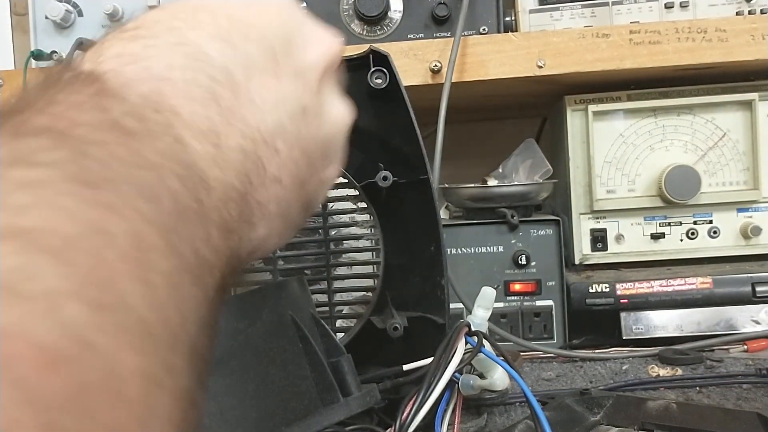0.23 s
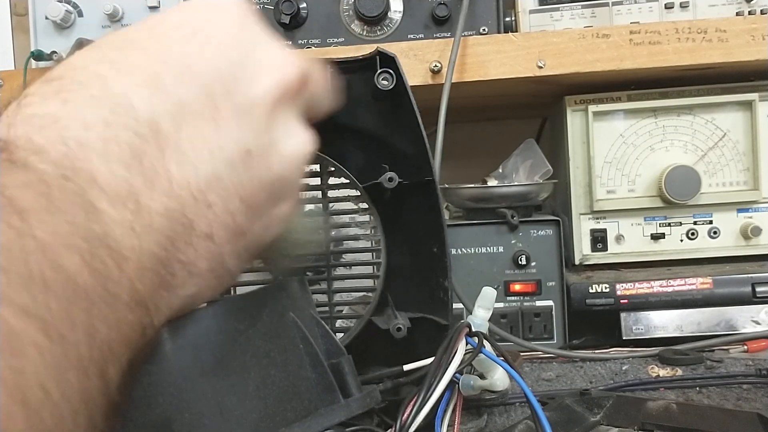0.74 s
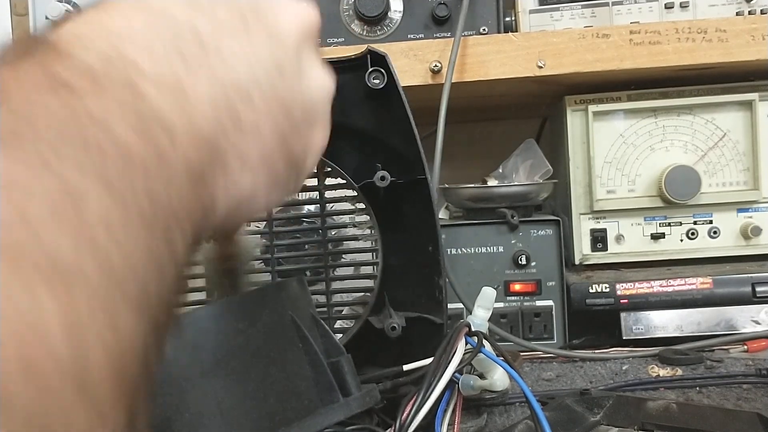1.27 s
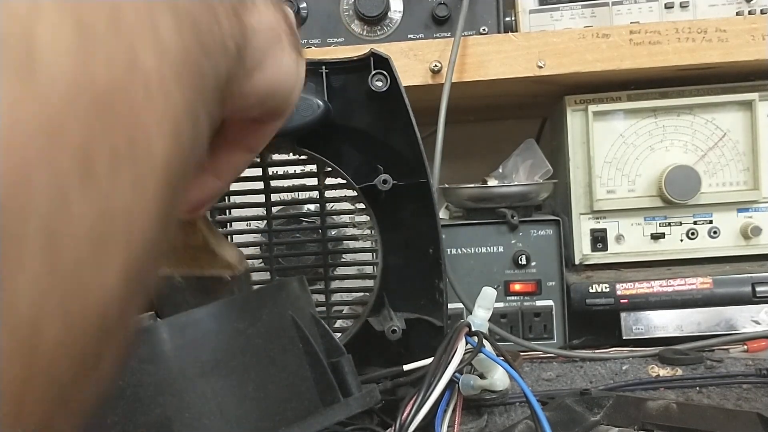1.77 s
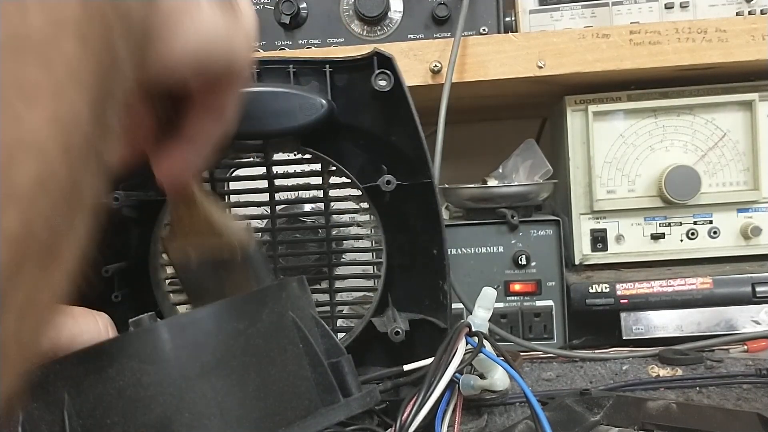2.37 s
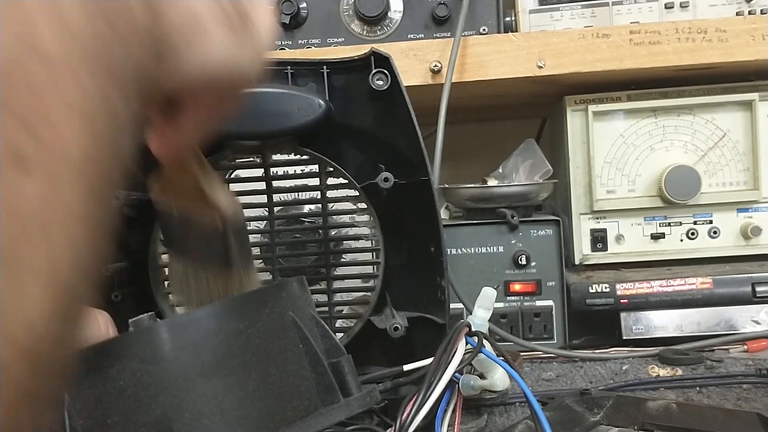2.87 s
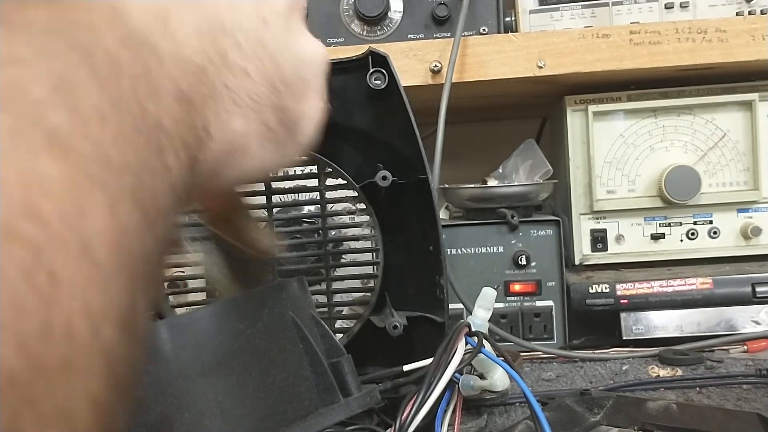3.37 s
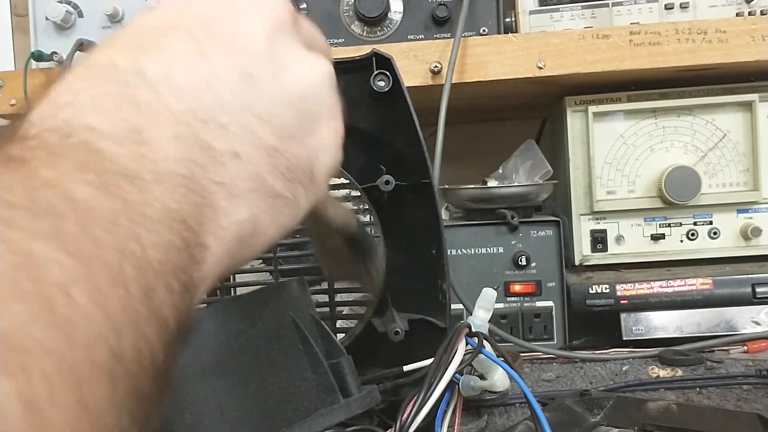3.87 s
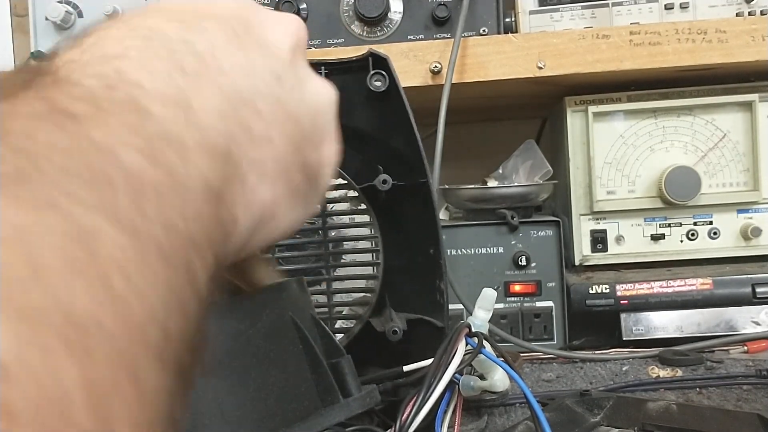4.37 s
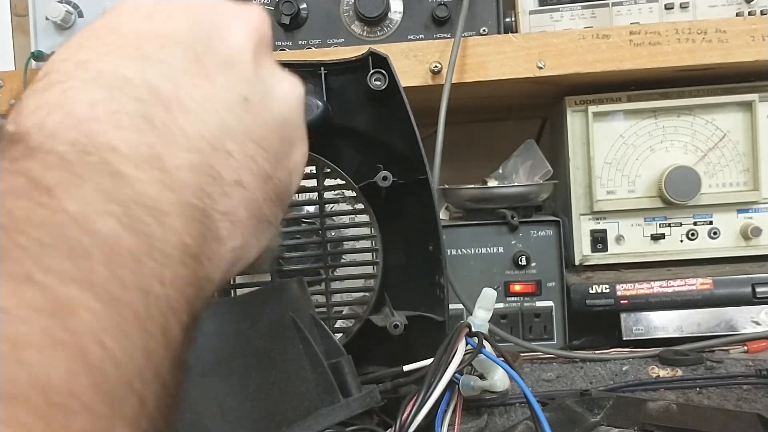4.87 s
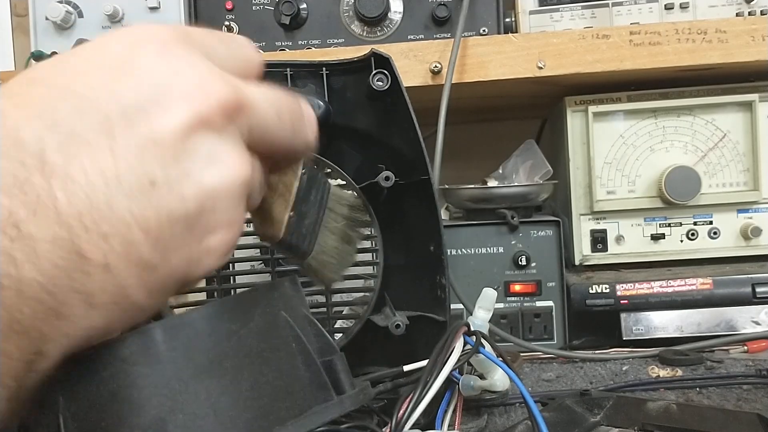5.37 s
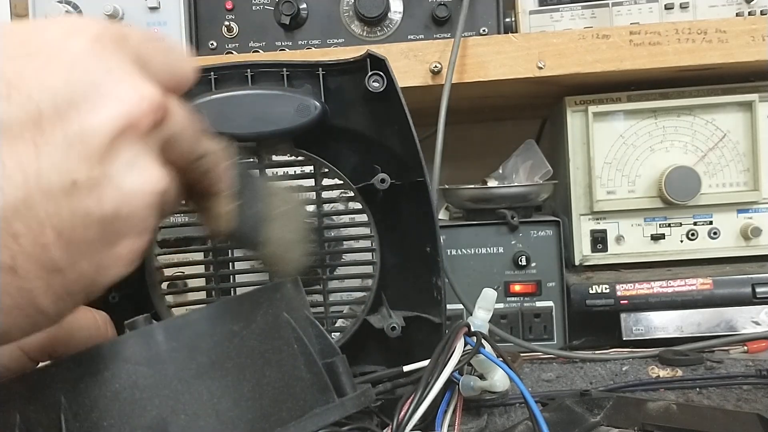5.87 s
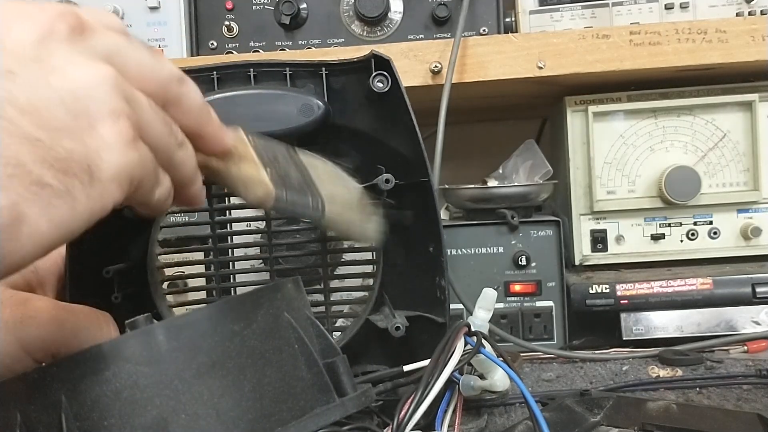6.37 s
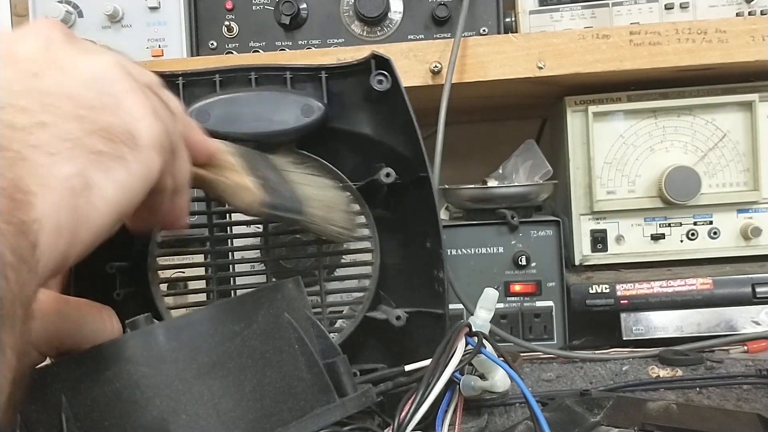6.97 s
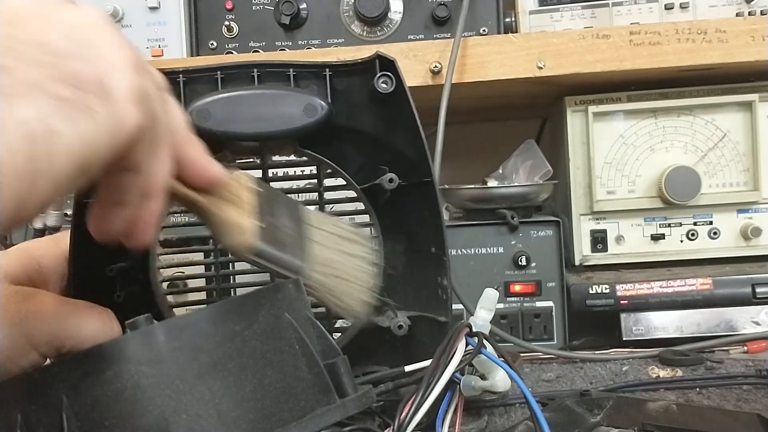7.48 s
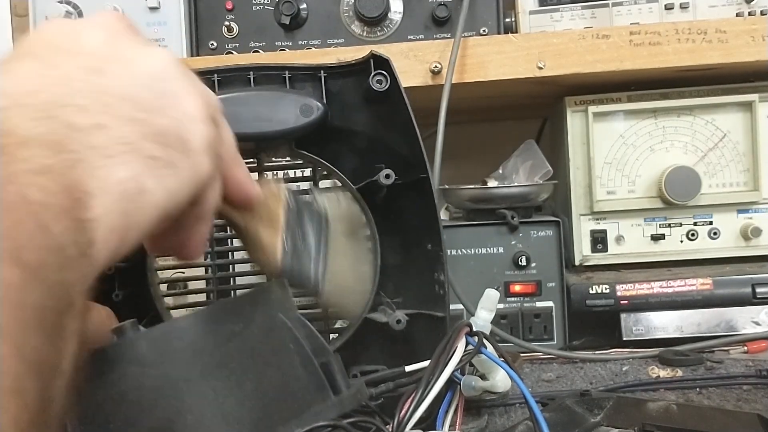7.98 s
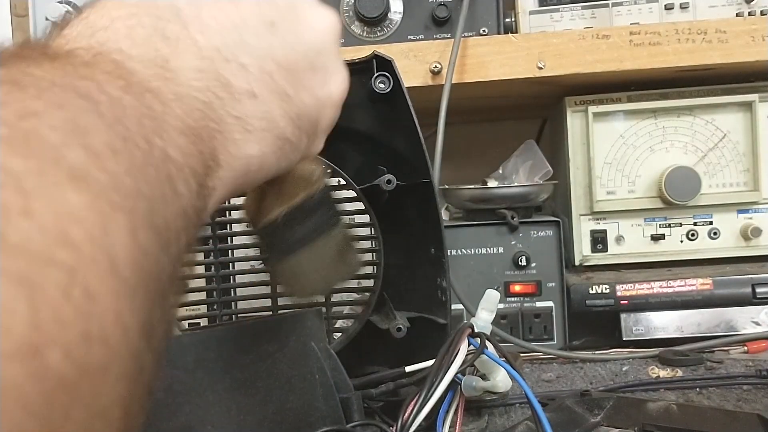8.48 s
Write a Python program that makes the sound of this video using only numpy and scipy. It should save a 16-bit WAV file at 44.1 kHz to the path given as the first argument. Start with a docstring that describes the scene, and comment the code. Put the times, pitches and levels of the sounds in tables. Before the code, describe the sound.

Dry, crackly brush scratching swells and fades over plastic slats, broken by sharp hollow plastic knocks and small rattles, close up indoors.

```python
"""Stiff bristles scrape over plastic slats: dense tiny clicks that swell and fade with each brush stroke.
Each click is a random snap, coloured by the slats; now and then a tuft ticks the shell of the heater.
The handle and ferrule knock the shell, which rings briefly as a set of dying tones, with a buzz of loose parts.
Behind this lies the low murmur of a small quiet workshop, made of shaped noise, strongest near 95 to 134 Hz.
Two microphone ports hear the brush from the left, with near reflections and a short tail."""
import sys
import numpy as np
from scipy import signal
from scipy.io import wavfile
from scipy.ndimage import uniform_filter1d

SR = 44100
rng = np.random.default_rng(int(sys.argv[2]) if len(sys.argv) > 2 else 0)


def dump(signal):
    """Clip the signal to [-1, 1] and save it as 16-bit WAV at the path in sys.argv[1]."""
    limited = np.clip(np.atleast_2d(signal).T, -1, 1)
    pcm = np.round(limited * 32767).astype(np.int16)
    wavfile.write(sys.argv[1], SR, pcm)


N = 384552

# Colour of the scratching before the slats add theirs: pitch_hz, relative_db (per Hz)
SCRATCH_COLOUR = [(120, -50.5), (200, -25.5), (311, -19), (394, -27), (851, -13.5), (1210, -9), (1350, -22),
                  (1480, -6.5), (1940, -14), (2700, -4.5), (4770, -3.5), (8420, -17.5), (16000, -23)]
# Level of the fine hiss (7.8 kHz and up) against the scratch: time_s, relative_db
HISS_LEVEL = [(0, -10), (1.2, -13.5), (1.8, -9.5), (2.999, -9.5), (4, -12), (5, -11), (5.999, -14),
              (6.8, -17.5), (7.5, -16), (8.7, -10)]


def bristles():
    """Bristle tips let go in clumps and ring the slats; now and then a tuft ticks the shell."""
    clump_db, patch_db = 1.5, 2.6  # how much the level and the colour wander
    tick_db, slat_tick_db = -9.0, -13  # ticks against the low body sound, and against the scratch
    hidden_share, pan_db = 0.99, 2.0
    scratch_level, body_level = contact_level()
    hiss_level = scratch_level * amp(np.interp(np.arange(N) / SR, *np.transpose(HISS_LEVEL)))

    wander = uniform_filter1d(uniform_filter1d(rng.standard_normal(N), 300), 300)
    clumps = amp(clump_db * evened(wander))
    hz = np.fft.rfftfreq(4096, 1 / SR)
    colour_db = read(SCRATCH_COLOUR, hz) + slat_lift(hz)
    clicks = clumps * snaps(10000, 1.7, channels=2)
    rung = signal.oaconvolve(clicks, causal(colour_db)[None], axes=1)[:, :N]

    # other slats ring as the brush moves
    f, _, z = signal.stft(rung, SR, nperseg=512)
    patches = uniform_filter1d(uniform_filter1d(rng.standard_normal(z.shape[1:]), 8, 0), 10, 1)
    # the far port also hears tips hidden from the near one
    hidden = np.clip(hidden_share * np.tanh(f / 1500), 0, 1)[:, None]
    far = np.sqrt(1 - hidden ** 2) * z[0] + hidden * z[1]
    z = np.array([z[0], far]) * amp(patch_db * evened(patches))
    rung = signal.istft(z, SR, nperseg=512)[1][:, :N]
    low = evened(band(rung, 150, 2200))
    middle = evened(band(rung, 2200, 7800))
    high = evened(band(rung, 7800, 16500))

    mode_level = amp(np.transpose(SHELL_MODES)[1]) * (-1) ** np.arange(len(SHELL_MODES))
    tap = (mode_level @ shell_modes(np.arange(3000) / SR, 0.17)).imag
    ticks = evened(signal.oaconvolve(snaps(140, 6.4, channels=1)[0], tap)[:N])
    slat_ticks = evened(band(ticks, *BLOW_BANDS[3]))
    scratch = scratch_level * (middle + amp(slat_tick_db) * slat_ticks)
    body = body_level * (low + amp(tick_db) * ticks)
    return (scratch + body + hiss_level * high) * amp([[pan_db / 2], [-pan_db / 2]])


# Brush strokes, from touch to full contact to lift-off; levels are before panning and the ports:
# fullest_s, swell_s, lift_s, scratch_db, body_relative_db (low shell sound against the scratch)
BRUSH_STROKES = [(0.02, 0.077, 0.2, -61.5, -9), (0.15, 0.081, 0.074, -65.5, -5.5),
                 (0.24, 0.1, 0.27, -64, -6), (0.634, 0.52, 0.13, -58.5, -7.5),
                 (0.848, 0.3, 0.15, -61.5, -7.5), (1.07, 0.23, 0.37, -60.5, -6.5),
                 (1.242, 0.11, 0.089, -62.5, -5.5), (1.432, 0.26, 0.039, -60.5, -5.5),
                 (1.556, 0.062, 0.13, -69, -4.5), (1.722, 0.19, 0.095, -56.5, -10.5),
                 (1.816, .07, 0.046, -54.5, -10.5), (1.889, .04, 0.21, -57.5, -10),
                 (2.031, 0.064, 0.045, -58.5, -11), (2.17, .03, 0.057, -61.5, 9),
                 (2.26, .07, 0.1, -55, -4.5), (2.385, 0.12, .08, -54.5, -12), (2.496, .1, .14, -54.5, -17),
                 (2.7, 0.064, 0.098, -65.5, 6), (2.895, 0.33, 0.29, -56, -13.5),
                 (3.259, 0.13, 0.095, -55.5, -11.5), (3.377, 0.076, 0.1, -53, -12.5),
                 (3.507, 0.056, 0.026, -51.5, 0), (3.64, 0.19, 0.025, -52.5, -12.5),
                 (3.74, 0.3, 0.16, -57, -10.5), (3.852, 0.023, 0.076, -47, -7.5),
                 (3.976, 0.091, 0.033, -49.5, -8.5), (4.12, 0.45, 0.14, -56.5, -9),
                 (4.147, .025, .03, -49, -8.5), (4.285, 0.14, 0.34, -52, -12), (4.558, 0.12, 0.19, -52, -9),
                 (4.7, .1, 0.16, -63.5, -7), (4.805, .07, 0.046, -56.5, -13),
                 (4.891, 0.09, 0.074, -65.5, -10.5), (5.088, 0.036, 0.097, -68.5, -12),
                 (5.19, 0.063, 0.15, -68, -8), (5.315, .06, .06, -71.5, -10.5),
                 (5.408, 0.059, 0.066, -71, -18), (5.61, 0.13, 0.1, -59.5, -3.5),
                 (5.848, 0.093, 0.17, -64.5, -10), (5.96, 0.046, 0.11, -57, -15),
                 (6.047, 0.045, 0.087, -55.5, -13), (6.136, 0.057, 0.036, -57.5, -14.5),
                 (6.241, .04, 0.1, -67, -9.5), (6.35, 0.072, 0.11, -61, -9), (6.445, 0.066, 0.27, -57, -10),
                 (6.525, 0.11, 0.058, -48, -18.5), (6.6, 0.054, 0.067, -59.5, -16),
                 (6.77, 0.033, 0.36, -58, -8.5), (6.893, 0.061, 0.11, -47.5, -17),
                 (6.989, .05, 0.033, -59, -6.5), (7.14, 0.035, 0.14, -56.5, -10.5),
                 (7.221, 0.079, 0.044, -45.5, -14), (7.312, 0.15, 0.041, -55.5, -9.5),
                 (7.435, 0.029, 0.14, -50, 6), (7.513, 0.1, 0.053, -47, -20),
                 (7.592, 0.064, 0.059, -53, -7), (7.665, 0.057, 0.076, -71, 2),
                 (7.734, 0.033, 0.16, -51, 1), (7.867, 0.04, 0.043, -48, -6.5),
                 (7.93, 0.048, 0.17, -68, -7), (8.056, 0.07, 0.33, -63, -7),
                 (8.189, 0.052, 0.085, -52, -7.5), (8.27, .05, 0.079, -70, -2.5),
                 (8.42, 0.1, 0.26, -61, -5.5), (8.52, 0.16, 0.58, -56.5, -19.5)]


def contact_level():
    """Strength of the scratch and the shell body sound; overlapping strokes add their power."""
    rounding = 2.17  # higher = more pointed swell
    t, power = np.arange(0, N, 32) / SR, np.zeros((2, -(-N // 32)))
    for s, swell, lift, db, body_db in BRUSH_STROKES:
        away = np.clip(np.where(t < s, (s - t) / swell, (t - s) / lift), 0, 1)
        swelling = np.cos(np.pi / 2 * away) ** rounding
        power += (amp([[db], [db + body_db]]) * swelling) ** 2
    return [np.interp(np.arange(N) / SR, t, np.sqrt(p)) for p in power]


def snaps(per_s, spread_db, channels):
    """Clicks at random times with random sign, a few of them large."""
    draw = rng.random((channels, N, 2))
    size = amp(spread_db * np.minimum(-np.log(draw[..., 0] + 1e-9), 5))
    happens = draw[..., 1] < per_s / SR
    sign = np.sign(draw[..., 1] - per_s / SR / 2)
    return size * sign * happens


# Resonances of the plastic slats: pitch_hz, width_hz, lift_db
SLAT_RESONANCES = [(1430, 47, 0), (2470, 92, -8), (3370, 170, 3), (3742, 260, 7), (4100, 43, -5.5),
                   (4250, 60, -8), (4700, 750, 2), (6077, 150, 1), (6440, 300, 2), (7200, 260, 3)]


def slat_lift(hz):
    """Lift in dB that the slat resonances give to whatever shakes the grille."""
    return sum(db / (1 + (2 * (hz - f) / w) ** 2) for f, w, db in SLAT_RESONANCES)


# Knocks on the shell; body_db is the peak before panning and the ports:
# start_s, body_db, thump_relative_db, brightness_relative_db, landing_spot_pitch_hz
SHELL_KNOCKS = [(0.07, -55.5, -14, 3.5, 1640), (0.138, -61, -36, -1, 1730), (0.257, -62, -20, -9, 1110),
                (0.336, -26.5, -13.5, -10, 1135), (0.421, -33, -5, -3, 674), (0.516, -59.5, -16, -8, 1130),
                (0.541, -54, -24, 10, 4900), (0.622, -58.5, -27, 2, 1080), (0.647, -54, -10, 4.5, 3660),
                (0.732, -57.5, -25, 0, 1740), (0.853, -54.5, -26, 10.5, 5000), (0.956, -57, -20, -12, 1140),
                (0.99, -42.5, -15.5, -13, 1110), (1.333, -58.5, -17, -6, 1180),
                (1.425, -63.5, -2, 3.5, 1590), (1.515, -78.5, -5, 14.5, 3920),
                (1.557, -58.5, -14, 2.5, 1740), (1.617, -60.5, -16, -6, 1110), (2.029, -63.5, -18, 7, 3230),
                (2.14, -30.5, -4.5, -2.5, 900), (2.378, -54.5, -8, -16, 845), (2.667, -20, -8, -2, 3920),
                (2.893, -65, -21, 6, 1740), (2.985, -66.5, -8, 8, 1740), (3.042, -65, -8, 2, 1740),
                (3.075, -41.5, -10.5, -10.5, 1110), (3.094, -46, -5.5, 12, 4500),
                (3.15, -60, 7.5, 10, 3360), (3.17, -50.5, -4, 2, 650), (3.29, -61.5, -13, 3, 1760),
                (3.402, -53.5, 8.5, 5.5, 744), (3.414, -18, -14.5, -8.5, 1154), (3.641, -58, -18, -1, 4800),
                (3.853, -36.5, 1.5, 0.5, 670), (4.056, -60.5, -16, 5.5, 1160),
                (4.101, -30.5, -15, -5.5, 1230), (4.16, -48.5, 14, 12.5, 4570),
                (4.185, -41.5, -0.5, 0, 4560), (4.379, -16.5, -14.5, -9.5, 1110),
                (4.678, -66.5, -17.5, 0.5, 1150), (5.2, -63, -4, 2, 1474), (5.424, -60.5, -9, 2, 1740),
                (5.534, -69, -14, 6, 1700), (5.613, -51.5, 0, -0.5, 664), (5.639, -40, -6, -3, 1110),
                (5.935, -59, 0, -6, 1180), (5.968, -33, -16, -8, 1120), (6.128, -57, -15, 1, 1760),
                (6.436, -68, -11, 13.5, 4510), (6.634, -64.5, -11.5, 10, 4650),
                (6.753, -43.5, -11.5, -10.5, 1055), (6.888, -57, -8, 11, 1520),
                (6.927, -54.5, 0.5, -6, 900), (6.993, -71.5, -7, 3, 1520), (7.269, -72, 15.5, 19, 850),
                (7.418, -18.5, -14, -5, 1120), (7.575, -79.5, 6.5, 26.5, 5000),
                (7.606, -61.5, 11, 18, 5300), (7.639, -60.5, 5, -5, 327), (7.717, -20, -14, -5, 1106),
                (7.789, -43, -3.5, -12, 1150), (7.93, -64, -7, -2, 1510), (8.028, -77.5, -2, 21.5, 1470),
                (8.124, -48.5, -7.5, -24, 1080), (8.138, -60, -7.5, -5.5, 1100),
                (8.183, -64.5, 9.5, 15.5, 3650), (8.417, -53, -2, -15, 4600), (8.485, -63, -16, 5, 1520),
                (8.605, -64.5, -14.5, 0, 1500)]
# Bands of a blow, in the order body, thump, middle, bright, top: low_hz, high_hz
BLOW_BANDS = [(800, 1600), (90, 800), (1600, 3000), (3000, 5500), (5500, 16000)]
# How long loose parts buzz, before lighter blows shorten it: pitch_hz, fall_by_60_db_s
RATTLE_DECAY = [(80, 0.24), (200, 0.037), (600, 0.18), (1500, 0.17), (3500, 0.11), (7000, 0.066),
                (14000, 0.17)]
# Colour of the loose parts before the slats and landing spot add theirs: pitch_hz, relative_db (per Hz)
RATTLE_COLOUR = [(29, -67), (50, -24.5), (418, -21), (1180, -13.5), (1960, -17), (3760, -22.5),
                 (4040, -20.5), (4450, -23.5), (6390, -30), (16000, -53.5)]


def knock(row, chance, buzz):
    """A blow rings the shell modes, most those near the landing spot's pitch, and buzzes loose parts."""
    full_ring_db, ring_per_db = -47, 0.35  # lighter blows ring shorter
    base_rattle, rattle_per_db = 0.57, 0.04  # brighter blows rattle more, dull ones ring clean
    middle_db, middle_share = -2, 0.55  # how far brightness lifts the 1.6-3 kHz band
    top_db, top_share, top_fade_s = -8.5, 1.4, 0.012  # the top band is over first
    place_db, favour_db, favour_width = 2.5, 8.0, 0.041  # chance per mode; lift at the landing spot
    turn, apart, through_db = 1.0, 1.0, -4.5  # phase and buzz differences of the ports; chatter level
    rise_s, crack_db, crack_s = 0.0016, 6.5, 0.009
    rebound_s, rebound_spread = 0.0065, 0.15
    rebound_db, rebound_per_db, hardest_db = -5.5, 1.47, -17  # harder blows rebound more
    pan_db = 4

    s, body_db, thump_db, bright_db, spot_hz = row
    levels = body_db + np.array([0, thump_db, middle_db + middle_share * bright_db, bright_db,
                                 top_db + top_share * bright_db])
    ring = np.clip(1 + ring_per_db * (max(levels) - full_ring_db), .3, 1)
    rattle_share = np.clip(base_rattle + rattle_per_db * bright_db, .1, 1)
    buzz = buzz[:, :round(buzz.shape[1] * (.2 + .8 * ring))]
    t = np.arange(buzz.shape[1]) / SR

    # the shell rings; each mode faces the ports differently
    hz, db = np.transpose(SHELL_MODES)
    db = db + favour_db / (1 + (np.log(hz / spot_hz) / favour_width) ** 2)
    start = amp(db + place_db * chance[:, 0]) * np.sign(chance[:, 1])
    start = np.array([start, start * np.exp(1j * turn * chance[:, 2] * np.tanh(hz / 2000))])
    rung = (start @ shell_modes(t, ring)).imag

    # loose parts buzz: noise coloured and fading at its own pace at each pitch
    f, frame_s, z = signal.stft(buzz, SR, nperseg=256, noverlap=192)
    spot_db = favour_db / (1 + (np.log((f + 1) / spot_hz) / (2 * favour_width)) ** 2)
    colour_db = read(RATTLE_COLOUR, f) + slat_lift(f) + spot_db
    fade_db = -60 * frame_s / (ring * read(RATTLE_DECAY, f)[:, None])
    z = (z[0] + apart * np.tanh(f / 1500)[:, None] * z[1:]) * amp(colour_db[:, None] + fade_db)
    rattle = signal.istft(z, SR, nperseg=256, noverlap=192)[1][:, :len(t)]

    # rebounds re-strike the same modes; the fifth power leaves only spiky hits
    hits = buzz[:1] ** 5 * amp(-60 * t / (ring * 0.11))
    short_ring = rung[:, :2500] * amp(-60 * t[:2500] / .2)
    chatter = signal.fftconvolve(hits, short_ring, axes=1)[:, :len(t)]
    loose = evened(rattle) + amp(through_db) * evened(chatter)
    blow = (1 - rattle_share) * evened(rung) + rattle_share * loose

    # hardest at first touch, then the hand damps it
    contact = (1 - np.exp(-t / rise_s)) * amp(crack_db * np.exp(-t / crack_s))
    struck = blow * contact
    # the handle bounces back onto the shell
    lag = round(rebound_s * (1 + rebound_spread * np.tanh(chance[0, 2])) * SR)
    rebound = np.pad(struck, ((0, 0), (lag, 0)))[:, :len(t)]
    struck = struck + amp(rebound_db + rebound_per_db * (body_db - hardest_db)) * rebound

    parts = [band(struck, *edges) for edges in BLOW_BANDS]
    parts[-1] = parts[-1] * np.exp(-t / top_fade_s)
    sound = 0
    for level_db, part in zip(levels, parts):
        peak = np.sqrt(uniform_filter1d(part[0] ** 2, 200).max())
        sound = sound + amp(level_db) * part / peak
    return s, sound * amp([[pan_db / 2], [-pan_db / 2]])


# Tones the plastic shell can ring at, before the landing spot favours some: pitch_hz, relative_db
SHELL_MODES = [(162, -35), (356.5, -19), (202, -19), (596.5, -7.5), (647.4, -16), (749, -8), (902, -6.5),
               (1110.4, 1.5), (1314, -9), (1420, -17), (1526, -12), (1660, -14), (1740, -6), (1893, -9),
               (2031, -8), (2133, -6.5), (2410, -17), (2704, -4), (3592, -21), (3302, -13), (3820, -9.5),
               (4403, -16.5), (4480, -16.5), (4746, -7), (5380, -26.5), (6580, -15), (7340, -30.5)]


def shell_modes(t, ring):
    """Every mode as a dying complex turn; plastic damps the high ones faster."""
    hz = np.transpose(SHELL_MODES)[0][:, None]
    t60 = ring * .095 * (1100 / hz) ** .45  # seconds to fall by 60 dB
    return np.exp((2j * np.pi * hz - np.log(1000) / t60) * t)


# Left-right balance added to that of each source: pitch_hz, left_minus_right_db
PORT_SHADOW = [(60, -7.5), (250, -1.5), (700, -2), (1500, 2.5), (3500, 3), (6000, 7.5), (9000, 2),
               (15000, 1)]
# Bench and shelf reflections: delay_s, left_db, right_db
NEAR_ECHOES = [(.0009, -19, -22), (.0047, -21, -19)]


def ports(x):
    """The right port lies a little farther and in shadow; both get near reflections and a short tail."""
    lag_s, tail_db, t60_s = .00007, -17.0, 0.19
    hz, t = np.fft.rfftfreq(4096, 1 / SR), np.arange(SR // 2) / SR
    taps = rng.standard_normal((2, len(t))) * amp(-60 * t / t60_s) * (t > .006)
    taps *= amp(tail_db) / np.linalg.norm(taps[0])
    taps[0, 0], taps[1, round(lag_s * SR)] = 1, 1  # direct sound
    for delay, left_db, right_db in NEAR_ECHOES:
        taps[:, round(delay * SR)] = amp(left_db), amp(right_db)
    shade_db = read(PORT_SHADOW, hz) / 2
    shade = np.array([causal(shade_db), causal(-shade_db)])
    heard = signal.oaconvolve(x, shade, axes=1)
    return signal.fftconvolve(heard, taps, axes=1)[:, :N]


# Colour of the workshop murmur: pitch_hz, relative_db (per Hz)
ROOM_COLOUR = [(18, -46.5), (30, -10.5), (64, -14), (95, 2), (134, -0.5), (170, -14.5), (239, -14),
               (303, -15), (512, -13), (649, -14), (702, -19), (913, -17.5), (3310, -22.5), (16000, -32)]
# How alike the two ports hear it, 1 = same, -1 = opposite: pitch_hz, likeness
ROOM_LIKENESS = [(60, 0.96), (180, 0.89), (550, -0.37), (1650, -0.5), (4970, 0.11), (15000, -1)]


def room_tone():
    """Steady random spectra make the workshop murmur, alike in both ports in the bass."""
    level_db, left_lift_db = -72.5, 2.0
    frames, hz = N // 512 + 5, np.fft.rfftfreq(2048, 1 / SR)
    a, b, c, d = rng.standard_normal((frames, 1025, 4)).T
    same = np.clip(read(ROOM_LIKENESS, hz), -1, 1)[:, None]
    left = a + 1j * b
    right = same * left + np.sqrt(1 - same ** 2) * (c + 1j * d)
    z = np.array([amp(left_lift_db) * left, right]) * amp(read(ROOM_COLOUR, hz))[:, None]
    murmur = signal.istft(z, nperseg=2048, noverlap=1536)[1][:, :N]
    return amp(level_db) * evened(murmur)


def amp(db):
    """Turn decibels into a plain multiplier."""
    return 10 ** (np.asarray(db) / 20)


def evened(x):
    """Scale to an average (RMS) level of one."""
    return x / np.sqrt(np.mean(x ** 2) + 1e-20)


def read(points, hz):
    """Read a curve between its points, on a logarithmic pitch scale."""
    f, value = np.transpose(points)
    return np.interp(np.log(hz + 1), np.log(f + 1), value)


def add(mix, s, sound):
    """Mix a sound in at s seconds, cut off at the end."""
    part = mix[:, round(s * SR):][:, :sound.shape[1]]
    part += sound[:, :part.shape[1]]


def band(x, lo_hz, hi_hz):
    """Keep only the pitches between two edges."""
    return signal.sosfilt(signal.butter(3, [lo_hz, hi_hz], "band", fs=SR, output="sos"), x)


def causal(gain_db):
    """Minimum-phase impulse response of a gain curve given from 0 to SR / 2."""
    log = np.log(amp(np.concatenate([gain_db, gain_db[-2:0:-1]])))
    return np.fft.ifft(np.exp(log - 1j * signal.hilbert(log).imag)).real[:2048]


def scene():
    """Brush and knocks reach the ports; the workshop murmur lies underneath."""
    blows = np.zeros((2, N))
    chance = rng.standard_normal((len(SHELL_KNOCKS), len(SHELL_MODES), 3))
    buzz = rng.standard_normal((len(SHELL_KNOCKS), 3, 6144))
    for row, c, b in zip(SHELL_KNOCKS, chance, buzz):
        add(blows, *knock(row, c, b))
    return ports(blows + bristles()) + room_tone()


def record(dry):
    """A steep low-pass filter removes what lies above about 15.9 kHz."""
    low_pass = signal.firwin(511, 15900, window=("kaiser", 9), fs=SR)
    return signal.oaconvolve(dry, low_pass[None], "same")


dry = scene()
out = record(dry)
dump(out)
```